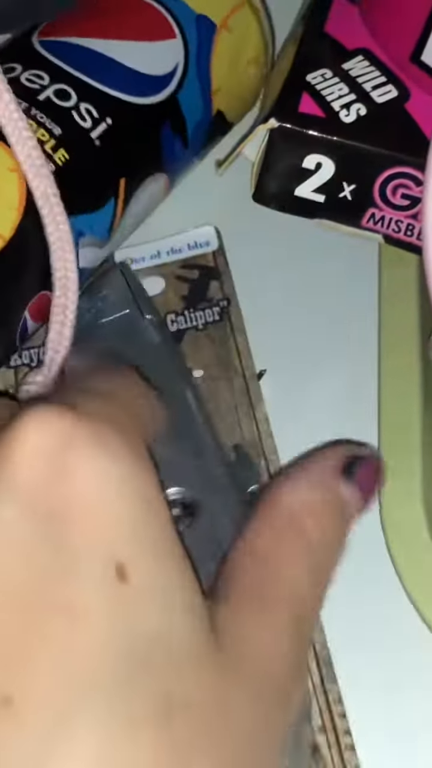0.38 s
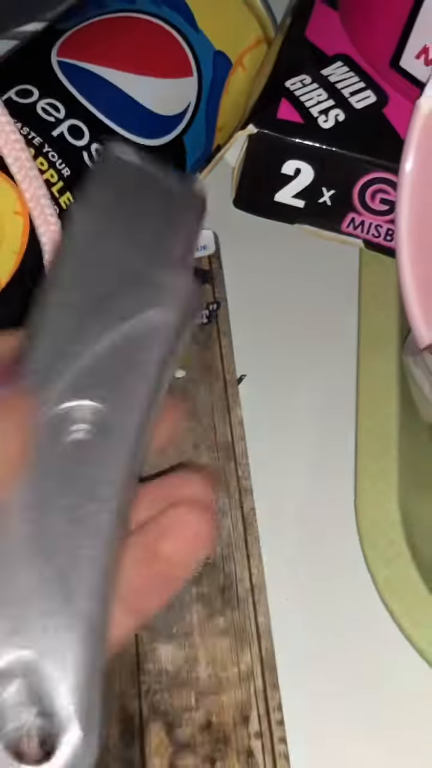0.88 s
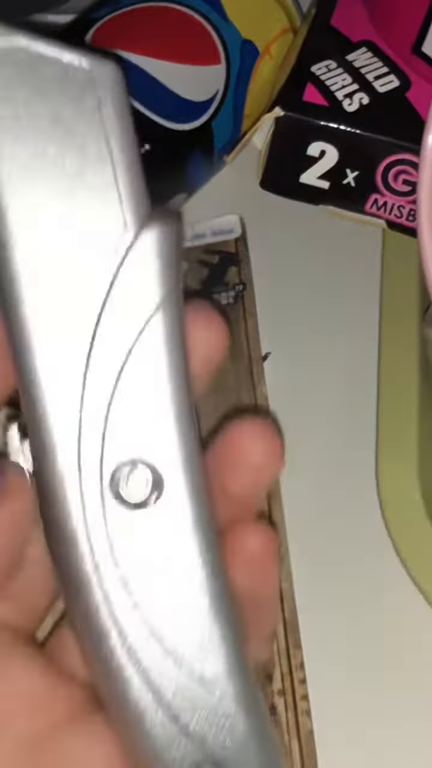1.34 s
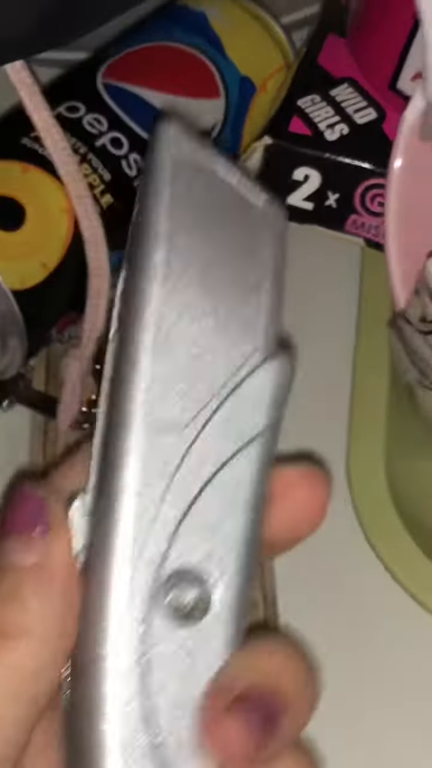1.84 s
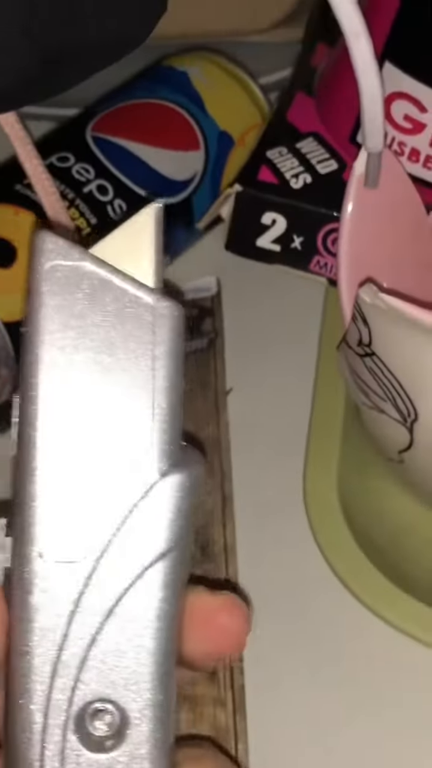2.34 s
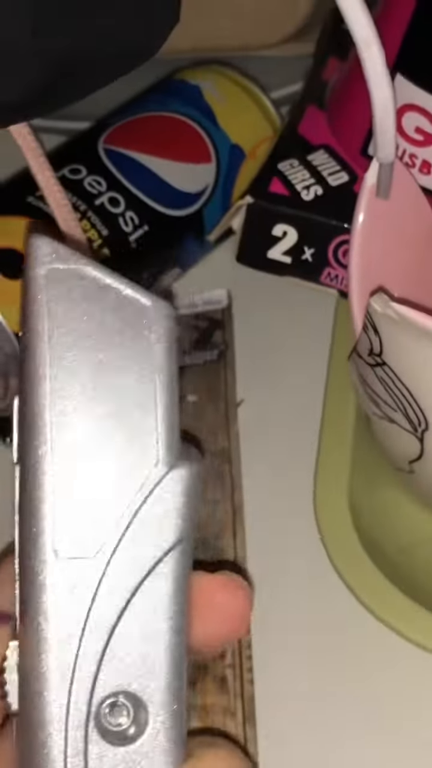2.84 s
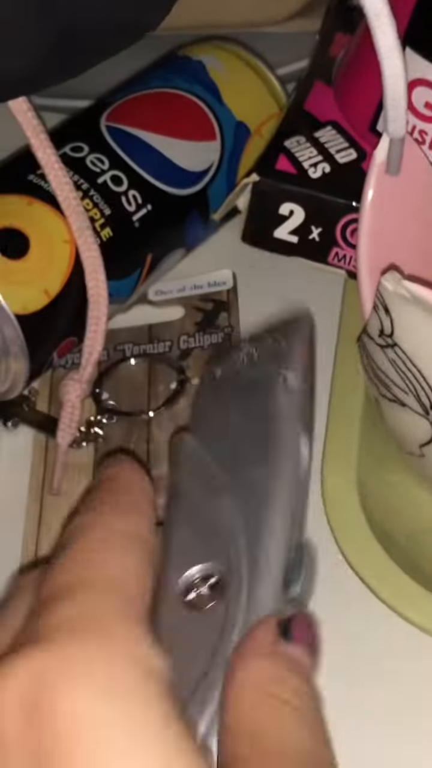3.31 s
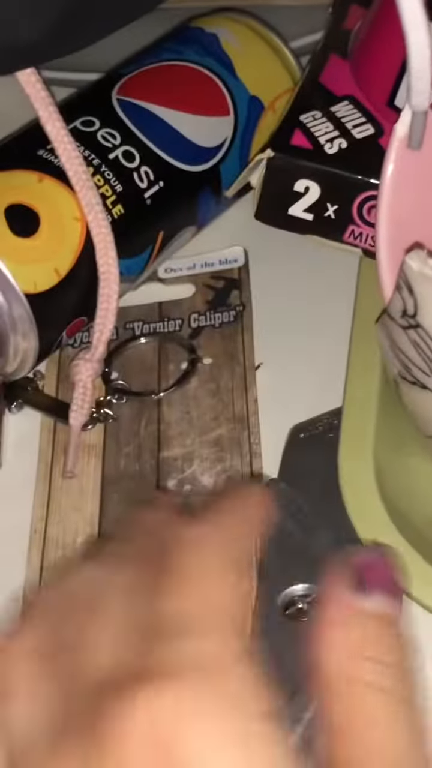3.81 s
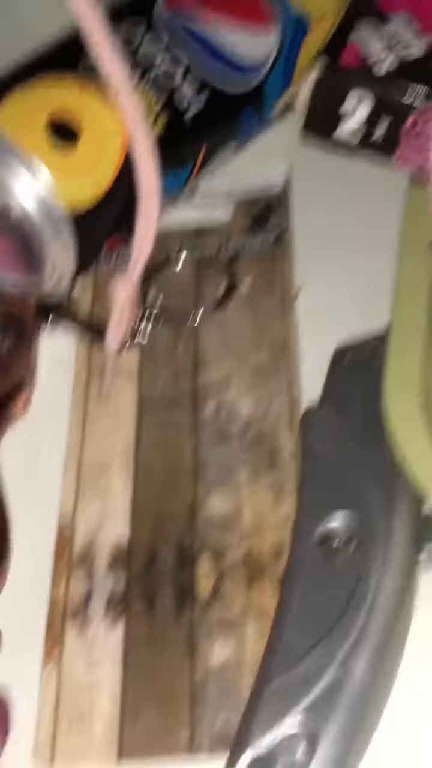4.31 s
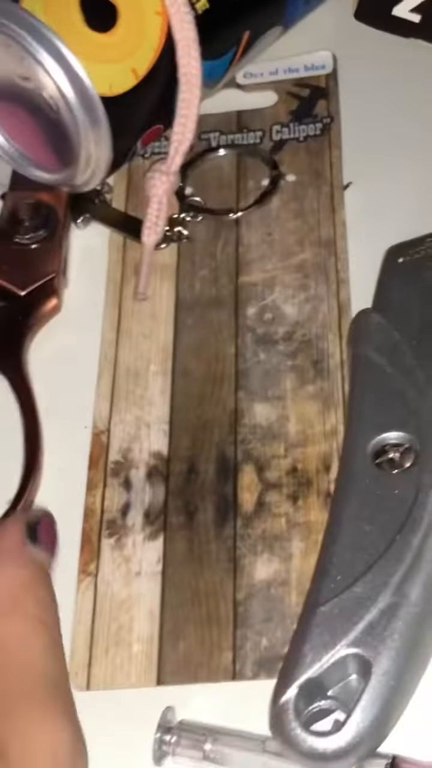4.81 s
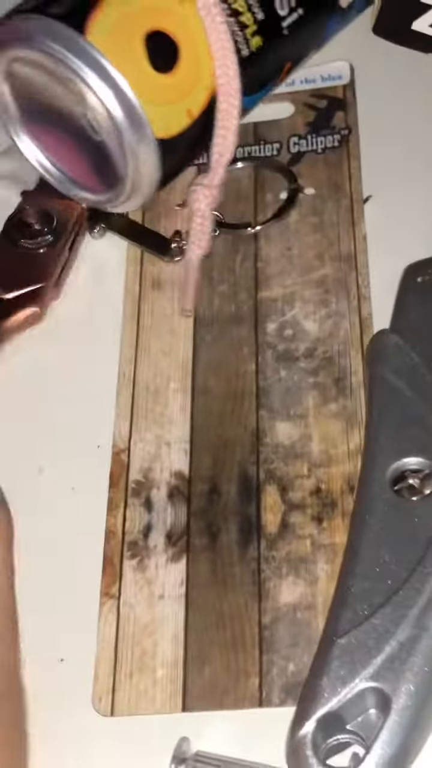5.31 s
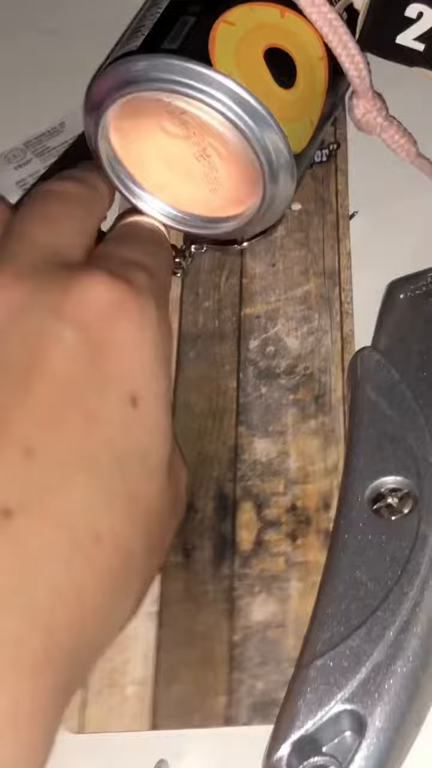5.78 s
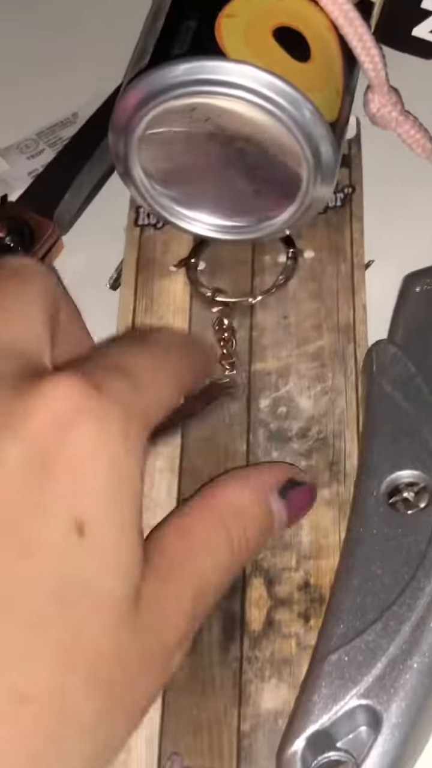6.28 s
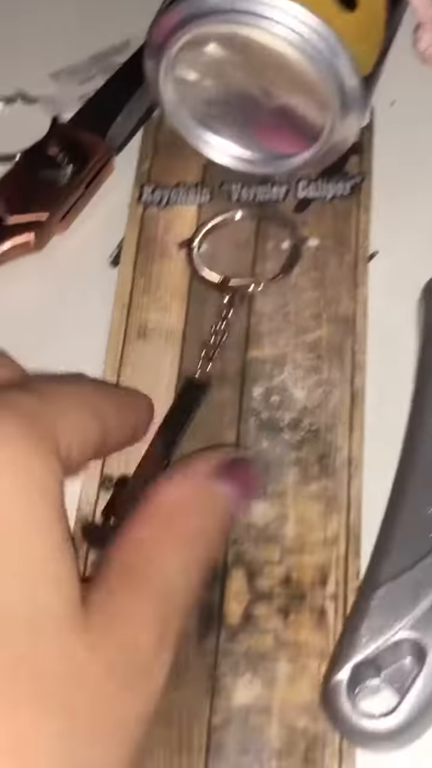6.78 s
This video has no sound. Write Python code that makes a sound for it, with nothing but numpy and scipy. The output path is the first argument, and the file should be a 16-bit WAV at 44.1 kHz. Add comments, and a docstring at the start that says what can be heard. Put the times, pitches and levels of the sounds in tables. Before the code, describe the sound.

Close handling of small metal things on a desk: rattles, crisp slider clicks, a loud clattering put-down, a tinny can knock and gritty dragging.

```python
"""A hand picks a metal utility knife out of clutter on a desk, works its slider and lays it down,
then drags a small tool on a keyring chain from under an empty can, in a quiet room close to a phone.
Knocks and ticks are short noisy contacts that ring desk, knife shell and steel modes; scrapes are
gritty friction noise with loose parts tapping along, and skids are narrow bands of noise.
The can rings when bumped and hums when rubbed; a short reverb and room tone lie behind."""
import sys
import numpy as np
from scipy import signal
from scipy.fft import rfft, irfft, next_fast_len
from scipy.io import wavfile
from scipy.ndimage import uniform_filter1d

SR = 44100
rng = np.random.default_rng(int(sys.argv[2]) if len(sys.argv) > 2 else 0)


def linear_from_db(decibels):
    """Turn decibels (scalar or array-like) into linear amplitude factors; 0 gives 1."""
    return 10 ** (np.asarray(decibels, float) / 20)


def materialize(psi):
    """Save the field psi as 16-bit PCM at rate SR to the path in sys.argv[1].

    A 1-D psi becomes a single channel; in a 2-D psi each row is a channel.
    """
    bounded = np.clip(np.atleast_2d(psi).T, -1, 1)
    quanta = np.round(bounded * 32767).astype(np.int16)
    wavfile.write(sys.argv[1], SR, quanta)


N = 314874  # samples, about 7.1 s
SPOT_DB = 3.5  # how unevenly a blow reaches the modes


def evened(x):
    """Scales to rms 1."""
    return x / np.sqrt(np.mean(x ** 2) + 1e-20)


def peaked(x, db):
    """Scales to a peak level."""
    return linear_from_db(db) * x / (abs(x).max() + 1e-12)


def read(points, hz):
    """Reads a curve of (Hz, value) points on a log-frequency axis."""
    f, value = np.transpose(points)
    return np.interp(np.log(hz + 1), np.log(f + 1), value)


def add(mix, s, sound):
    """Adds a sound at s seconds."""
    part = mix[max(round(s * SR), 0):][:len(sound)]
    part += sound[:len(part)]


def coloured(x, gain):
    """Filters by a gain given as a function of Hz."""
    size = next_fast_len(len(x))
    spectrum = rfft(x, size) * gain(np.fft.rfftfreq(size, 1 / SR))
    return irfft(spectrum, size)[:len(x)]


def band(x, lo_hz, hi_hz):
    """Causal band-pass."""
    sos = signal.butter(2, [lo_hz, min(hi_hz, .45 * SR)], "band", fs=SR, output="sos")
    return signal.sosfilt(sos, x)


def ring(modes, t, luck, centre_hz, octaves, spot_db):
    """Impulse response of a struck thing; the spot that is hit sets how much each mode gets."""
    hz, db, t60 = np.transpose(modes)[:, :, None]
    near_db = -3 * (np.log2(hz / centre_hz) / octaves) ** 2
    spot = luck[:len(modes), None]
    decay_db = -60 * t / np.maximum(t60, .003)
    level = linear_from_db(db + near_db + spot_db * spot + decay_db)
    detuned_hz = hz * (1 + 0.0093 * spot)
    return (level * np.sin(2 * np.pi * detuned_hz * t)).sum(0)


def blow(modes, luck, db, centre_hz, t60, crack_db, octaves, rise, longest, lowest_hz):
    """A rough contact that dies fast: it sounds itself and drives the modes, damped by the hand."""
    t = np.arange(4096) / SR
    contact = luck * np.minimum(t / rise, 1) * linear_from_db(-60 * t / max(t60, .002))
    crack = band(contact, centre_hz / 2 ** octaves, centre_hz * 2 ** octaves)
    held = ring(modes, t, luck[::-1], centre_hz, octaves, spot_db=SPOT_DB) * linear_from_db(-60 * t / longest)
    chatter = signal.fftconvolve(contact, held)[:len(t)]
    rung = peaked(held, 0) + peaked(chatter, -3)  # first touch, then the chatter after it
    both = peaked(rung, 0) + peaked(crack, crack_db)
    return contact, peaked(band(both, lowest_hz, 14000), db)


# Something lands on the desk or the clutter.
# Each row: start in seconds, peak in dB, centre in Hz, desk thud in dB re that peak.
KNOCKS = [(.004, -23.5, 395, -11.5), (.039, -14.5, 1340, -16), (.223, -35, 380, -15),
          (0.25, -29.5, 387, -4.5), (0.271, -29.5, 358, -20), (0.434, -40.5, 870, 1.5),
          (0.637, -40, 1630, -0.5), (0.681, -21.5, 2160, -45), (0.724, -29, 1445, -18),
          (.743, -30, 1670, -31), (1.169, -27.5, 456, -16), (1.196, -28.5, 1075, -11),
          (1.697, -49, 1250, -27), (1.812, -49, 848, -24.5), (2.485, -52, 1950, -28),
          (2.692, -26, 2200, -38), (2.983, -49, 1080, -31), (3.425, -3, 460, -34), (3.424, -6, 1400, -40),
          (3.44, -14, 1620, -31), (3.479, -17, 444, -18.5), (3.536, -15, 540, -25.5),
          (3.6, 2.5, 1400, -21.5), (3.616, -10.5, 410, -14), (3.639, -6, 865, -19), (3.679, -19, 740, -7.5),
          (3.794, -24, 791, -13), (3.828, -25, 656, -23), (3.838, -22.5, 940, -20), (3.873, -19, 950, -27),
          (4.438, -50, 377, -13), (4.981, -37.5, 369, -29), (5.056, -30.5, 367, -29.5),
          (5.177, -40, 347, -20), (5.328, -18, 577, -65), (5.375, -23.5, 1120, -12), (5.53, -15, 1510, -16),
          (5.546, -17, 884, -23), (5.565, -24, 910, -18.5), (5.706, 0, 1180, -41.5), (5.722, -14, 338, -43),
          (5.854, -8.5, 1006, -46), (5.924, -13, 945, -20), (5.953, -19.5, 980, -21),
          (6.032, -18.5, 936, -51), (6.451, -37, 436, -2), (6.559, -11.5, 713, -18),
          (6.596, -10.5, 670, -22), (6.615, -13, 696, -9.5), (6.649, -3, 1260, -28),
          (6.873, -21, 1430, -35.5), (7.074, -17, 1660, -37)]
# Knife shell and desk top. Each row: mode in Hz, level in dB, undamped t60 in seconds.
BODY = [(358, 5, 0.037), (460, 11.5, 0.021), (750, -1, 0.025), (800, -1, 0.044), (1045, 1, 0.04),
        (1200, 12.5, 0.013), (1416, -5.5, 0.15), (1537, 5.5, 0.049), (1723, -5, 0.071), (2260, -13, 0.013),
        (2200, 0, 0.11), (2760, 2.5, 0.049)]
KNOCK_T60_S, KNOCK_DULL = 0.03, 0.26  # contact t60 at 1 kHz; duller knocks last longer by this power


def knocks():
    """Dull blows: shell and desk modes over a low thud."""
    out = np.zeros(N)
    for (s, db, hz, thud_db), luck in zip(KNOCKS, rng.standard_normal((len(KNOCKS), 4096))):
        t60 = KNOCK_T60_S * (hz / 1000) ** -KNOCK_DULL
        contact, knock = blow(BODY, luck, db, hz, t60, crack_db=-5, octaves=0.66,
                              rise=0.00022, longest=.07, lowest_hz=312)
        thud = band(band(contact, 60, 320), 47, 640)
        add(out, s, knock + peaked(thud, db + thud_db))
    return out


# Metal meets metal: slider, blade, ring, chain.
# Each row: start in seconds, peak in dB, centre in Hz, sparkle in dB re that peak.
TICKS = [(.0258, -15, 9290, 7), (.071, -28.5, 6040, -22.5), (0.102, -38.5, 6300, -20.5),
         (0.1243, -22.5, 5800, -18), (0.1287, -27, 5440, -17.5), (0.2022, -41, 2880, 1),
         (0.2377, -28, 6200, -12), (0.2488, -19, 4680, -16), (0.2703, -15, 6300, -20),
         (0.2943, -16.5, 8700, -1.5), (0.4502, -27, 6440, -19.5), (0.5549, -34.5, 4570, -20),
         (0.594, -29, 5300, -14), (0.6362, -25, 6750, -6.5), (0.6969, -24, 6060, -18.5),
         (1.1652, -25.5, 4000, -17), (1.1976, -40, 3050, -7), (1.5657, -39.5, 6030, -19),
         (1.5795, -26.5, 3430, -9), (1.697, -43.5, 2960, -18), (1.7124, -48.5, 2860, -31),
         (1.811, -44, 6200, -32), (1.932, -13, 3444, -10.5), (1.944, -15, 3870, -4.5),
         (2.0257, -35.5, 3180, -3.5), (2.0693, -10, 6050, -4), (2.4856, -40.5, 3250, -24.5),
         (2.5734, -12.5, 6550, -25), (2.5857, -37, 3280, 3), (2.612, -37.5, 3290, -29),
         (2.6914, -9, 6220, -16), (2.7102, -14, 3100, -13.5), (2.7423, -17.5, 5600, -20),
         (2.835, -43, 3230, -33), (2.9352, -43.5, 2800, 4), (2.983, -30.5, 4300, -17),
         (3.251, -50.5, 6400, -17), (3.3991, -49.5, 6534, -17), (3.4217, 2, 4000, -12.5),
         (3.4439, -14, 5170, -15.5), (3.4776, -23.5, 3500, -25), (3.5354, -24.5, 5700, -12),
         (3.561, -28.5, 3170, -9), (3.6002, 1.5, 2460, -28.5), (3.6386, -14, 2400, -21.5),
         (3.6745, -23.5, 2550, -11.5), (3.8247, -32, 3500, -5), (3.8351, -15.5, 6050, -9),
         (3.8496, -23.5, 5840, -24), (3.858, -19.5, 2840, -9.5), (3.8726, -14.5, 6400, -13),
         (5.013, -57, 5560, 0.5), (5.0512, -42, 4200, 1.5), (5.0676, -33.5, 5200, -2),
         (5.0825, -45, 2920, -2), (5.317, -30.5, 3950, -12.5), (5.4134, -6, 6070, -5.5),
         (5.6458, -28, 6260, -8.5), (5.7074, -3.5, 5800, -14.5), (5.7179, -9.5, 3260, -11),
         (5.7551, -27.5, 6000, -25), (5.8537, -17.5, 2930, -7), (5.8736, -24, 4040, -4.5),
         (5.8944, -18.5, 5280, -11), (5.9253, -20.5, 2900, -11.5), (5.9501, -29, 2925, -14.5),
         (6.0316, -38, 3040, -20), (6.2602, -39, 4790, -8.5), (6.2724, -24, 4800, -10),
         (6.2923, -28, 6550, -23), (6.3514, -31.5, 6300, -21), (6.6512, -29, 2640, -30),
         (6.859, -41, 5960, -14.5), (6.8713, -21.5, 6800, -10), (7.026, -12, 4615, -7),
         (7.076, -15.5, 7100, -5.5)]
# Blade and small steel parts. Each row: mode in Hz, level in dB, undamped t60 in seconds.
STEEL = [(3000, -6, 0.026), (3250, 6, 0.012), (4200, -7.5, 0.0054), (5230, -16.5, 0.0065),
         (6040, -12.5, 0.023), (6220, 5, 0.01), (7160, 0, 0.0083), (7700, -19, 0.005), (9030, -2.5, 0.025),
         (9900, -14.5, 0.016), (11600, -4.5, 0.048), (12000, 0.5, 0.043), (12700, -9, .01)]
TICK_T60_S = 0.016  # contact t60


def ticks():
    """Bright blows: short steel modes, with a sparkle on top."""
    out = np.zeros(N)
    for (s, db, hz, sparkle_db), luck in zip(TICKS, rng.standard_normal((len(TICKS), 4096))):
        contact, tick = blow(STEEL, luck, db, hz, TICK_T60_S, crack_db=0.0, octaves=0.6,
                             rise=0.00044, longest=0.026, lowest_hz=1400)
        sparkle = band(band(contact, 9500, 15500), 9500, 15500)
        add(out, s, tick + peaked(sparkle, db + sparkle_db))
    return out


def stroke(t, start, end, rise, fall, fade_db):
    """0 to 1 and back: rubbing rises over the given time, tires and lets go over the given fall time."""
    tiring = linear_from_db(-fade_db * np.clip((t - start) / max(end - start, .005), 0, 1))
    letting_go = np.clip((end - t) / fall + .5, 0, 1) ** 2
    return np.clip((t - start) / rise, 0, 1) * letting_go * tiring


def patchy(x, db):
    """The colour shifts in patches as other spots of the surfaces meet."""
    z = signal.stft(x, nperseg=256)[2]
    over_time = uniform_filter1d(rng.standard_normal(z.shape[::-1]), size=8, axis=0)
    patches = uniform_filter1d(over_time, size=4, axis=1)
    return signal.istft(z * linear_from_db(db * evened(patches).T), nperseg=256)[1][:len(x)]


JINGLES_PER_S, JINGLE_SPREAD_DB = 90, 5.5
JINGLE_RING_S = .045  # longest t60 of a tap


def jingle():
    """Loose parts tap at random, each spot with its own share of the modes."""
    t, modes, out = np.arange(2048) / SR, BODY + STEEL + CAN, np.zeros(N)
    sizes = linear_from_db(JINGLE_SPREAD_DB * np.minimum(rng.exponential(1, N), 3))
    taps = sizes * (rng.random(N) < JINGLES_PER_S / SR)
    spot = rng.integers(0, 8, N)
    for k, luck in enumerate(rng.standard_normal((8, len(modes)))):
        tap = ring(modes, t, luck, 3100, 1.3, spot_db=SPOT_DB) * linear_from_db(-60 * t / JINGLE_RING_S)
        out += signal.oaconvolve(taps * (spot == k), tap / np.linalg.norm(tap))[:N]
    return evened(out)


# Things slide and shuffle, or rattle on after a blow, one row each.
# Each row: start in seconds, end in seconds, level in dB ahead of the layer levels, brightness in dB.
SCRAPES = [(0, .042, -39.5, 6.5), (.041, .119, -44.5, 0), (.152, .22, -62.5, -9), (.208, .319, -45.5, -1.5),
           (.304, .403, -56.5, 2), (.395, .479, -53.5, 7), (.47, .584, -63, -1.5), (.577, .718, -56, 6),
           (.715, .769, -56.5, -5), (1.1, 1.169, -55.5, -11.5), (1.157, 1.248, -72, -25),
           (1.302, 1.436, -75, 1), (1.572, 1.724, -79, 5), (1.952, 1.994, -73.5, -0.5),
           (2.013, 2.082, -58, 5.5), (2.568, 2.636, -72.5, 10), (2.691, 2.708, -39, 12),
           (2.726, 2.749, -49.5, 6), (3.417, 3.484, -29.5, -3), (3.532, 3.585, -43, -13),
           (3.592, 3.687, -36, -8), (3.68, 3.797, -56.5, -8.5), (3.795, 3.822, -56.5, -12),
           (3.829, 3.89, -36, -8.5), (4.435, 4.5, -82, -7), (4.55, 4.65, -66.5, -2.5),
           (4.68, 4.757, -69.5, -5.5), (4.981, 5.043, -68, -13), (5.031, 5.126, -52, -6.5),
           (5.146, 5.17, -53, 6.5), (5.172, 5.266, -66.5, 1.5), (5.245, 5.337, -49.5, -2.5),
           (5.311, 5.413, -45, -3), (5.407, 5.456, -44, 10), (5.449, 5.528, -59, 5.5),
           (5.526, 5.546, -42.5, -4), (5.546, 5.611, -50, -9.5), (5.646, 5.716, -50, -0.5),
           (5.714, 5.751, -28.5, -1.5), (5.757, 5.772, -45, 6.5), (5.827, 5.89, -35.5, -5.5),
           (5.877, 5.923, -37.5, 1.5), (5.932, 6.009, -40.5, -1), (5.993, 6.077, -45.5, -3.5),
           (6.052, 6.193, -54, 0), (6.223, 6.304, -54.5, 8.5), (6.318, 6.392, -62, 8.5),
           (6.395, 6.474, -67.5, 11), (6.468, 6.574, -55.5, 6), (6.54, 6.684, -45, -8),
           (6.56, 6.73, -69.5, 7), (6.651, 6.752, -53.5, -12.5), (6.832, 6.892, -62.5, -5),
           (6.904, 6.975, -53, 9), (7.028, 7.07, -62, 5.5), (7.069, 7.147, -48, 2.5)]
# The hand moving among the clutter late on: one long stroke, columns as in SCRAPES.
SHUFFLE = (5, 7, -65.5, -4.5)
# Colour of sliding. Each row: frequency in Hz, level in dB per Hz.
DRAG = [(24, -46), (40, -30.5), (168, -4.5), (406, -3), (438, 2), (564, 2), (656, -3), (1710, -1),
        (1990, -11), (4230, -10.5), (11900, -29), (15300, -24.5), (16500, -53)]
# Rumble, drag, rasp and hiss of a stroke of even brightness: one level in dB for each.
LAYER_DB = (-6.5, 1, -0.5, -1)
# How far each of those layers follows the brightness: dB per dB.
LAYER_STEP = (-1, -0.7, .55, 1.5)
JINGLE_DB = -4.5  # taps re the friction


def friction():
    """Tiny uneven catches roughen smooth noise; the parts ring along and loose ones tap."""
    t = np.arange(2048) / SR
    catches = linear_from_db(1.0 * np.minimum(rng.exponential(1, N), 3)) * (rng.random(N) < 300 / SR)
    lumps = signal.lfilter([1], [1, -np.exp(-1 / (0.0023 * SR))], catches)
    rough = (1 + 0.79 * evened(lumps)) * rng.standard_normal(N)
    grit = coloured(rough, lambda hz: linear_from_db(read(DRAG, hz)))
    parts = BODY + STEEL
    rattle = ring(parts, t, np.zeros(len(parts)), 1700, 2.3, spot_db=0)
    ringing = evened(signal.oaconvolve(grit, rattle)[:N])
    return patchy(evened(grit) + linear_from_db(-10.5) * ringing + linear_from_db(JINGLE_DB) * jingle(), db=1.0)


def scrapes():
    """Sliding and rattling: one friction noise in four bands that follow each stroke's brightness."""
    t = np.arange(N) / SR
    grit = friction()
    slow = t[::32]  # envelopes need fewer points
    rows = SCRAPES + [SHUFFLE]
    blows = np.array([row[0] for row in KNOCKS + TICKS])
    strokes = []
    for start, end, _, _ in rows:
        nearest = blows[abs(blows - start).argmin()]
        # a blow close by sets the stroke off at once; otherwise it swells
        begin, rise = (nearest, .003) if abs(nearest - start) < .012 else (start, .03)
        strokes.append(stroke(slow, begin, end, rise, fall=0.032, fade_db=1.5))
    strokes = np.array(strokes)
    out = np.zeros(N)
    level_db, brightness = np.transpose(rows)[2:]
    edges_hz = [(60, 400), (400, 2500), (2500, 7000), (7000, 16500)]
    for (lo, hi), layer_db, step in zip(edges_hz, LAYER_DB, LAYER_STEP):
        layer = evened(coloured(grit, lambda hz: 1 / (1 + (lo / (hz + 1)) ** 6) / (1 + (hz / hi) ** 6)))
        envelope = linear_from_db(level_db + layer_db + step * brightness) @ strokes
        out += layer * np.interp(t, slow, envelope)
    return out


# One part drags on another and sings in a narrow band. Each row: start in seconds, end in seconds,
# centre in Hz, distance in Hz from the centre to half gain, level in dB.
SKIDS = [(2.018, 2.049, 3260, 500, -46), (3.627, 3.82, 3400, 600, -54), (5.152, 5.18, 4360, 880, -48.5),
         (5.873, 5.885, 13600, 900, -28.5), (6.001, 6.187, 4640, 800, -43.5),
         (6.271, 6.279, 13200, 813, -33), (6.424, 6.58, 5600, 1200, -54), (7.034, 7.06, 7160, 420, -51.5),
         (7.02, 7.078, 3940, 413, -55), (7.072, 7.14, 3370, 800, -44)]


def skids():
    """Friction noise inside one resonance, swelling and fading."""
    out = np.zeros(N)
    for (start, end, centre_hz, width, db), noise in zip(SKIDS, rng.standard_normal((len(SKIDS), SR // 4))):
        sung = evened(coloured(noise, lambda hz: 1 / (1 + ((hz - centre_hz) / width) ** 4)))
        sung = sung[:round((end - start) * SR)]
        add(out, start, linear_from_db(db) * sung * signal.windows.tukey(len(sung), .6))
    return out


# Thin wall of the can. Each row: mode in Hz, level in dB, undamped t60 in seconds.
CAN = [(845, -8, .3), (861, 0, .4), (1986, -14, .6), (355, -3, .18), (2230, -7, .12), (490, -10, .15),
       (1184, -8, .1), (1427, -8, .12), (1728, -12, .12), (2700, -12, .12), (3020, -16, .1),
       (3550, -14, .12), (3920, -17, .15), (4150, -14, .15), (5300, -14, .14), (6200, -17, .1)]
# The can is bumped. Each row: start in seconds, peak of its ring in dB, Hz around which it is set
# going, spread in octaves.
CAN_BUMPS = [(.005, -30, 400, 0.31), (.039, -27.5, 1070, 0.65), (.065, -23.5, 836, 0.42),
             (0.226, -34, 360, 0.46), (.25, -29.5, 1500, 1.7), (.742, -46, 1200, 0.9),
             (5.528, -38, 3800, 0.8), (5.707, -15.5, 880, 1.7), (5.72, -15.5, 362, 0.524),
             (5.854, -38, 900, 0.99)]
# Sliding things touch the can. Each row: start in seconds, end in seconds, hum in dB re the sliding.
CAN_RUBBED = [(0, 0.774, -7), (5.051, 5.63, -8.5), (5.685, 5.8, -4), (5.864, 6.3, -16)]
CAN_HUM_HZ, CAN_HUM_OCTAVES = 4000, 1.3  # rubbing favours the wall's upper modes
CAN_HUM_S = .2  # longest t60 of the wall while things lean on it


def can(sliding):
    """The empty can rings on after each bump and hums while things slide along it."""
    t, out = np.arange(SR // 2) / SR, np.zeros(N)
    even = np.zeros(len(CAN))  # no spot is favoured
    for s, db, hz, octaves in CAN_BUMPS:
        bump = ring(CAN, t, even, hz, octaves, spot_db=0) * np.minimum(t / 0.001, 1)
        add(out, s, peaked(bump, db))
    touching = np.zeros(N)
    for start, end, db in CAN_RUBBED:
        touching += linear_from_db(db) * stroke(np.arange(N) / SR, start, end, rise=.01, fall=.05, fade_db=0)
    wall = ring(CAN, t, even, CAN_HUM_HZ, CAN_HUM_OCTAVES, spot_db=0)
    wall = wall * linear_from_db(-60 * t / CAN_HUM_S)  # partly damped by what leans on it
    return out + signal.oaconvolve(sliding * touching, wall / np.linalg.norm(wall))[:N]


# Reverb of the room. Each row: frequency in Hz, t60 in seconds.
ROOM = [(200, 0.21), (1000, 0.31), (4000, 0.3), (12000, 0.2)]


def room(x):
    """Sparse taps of random sign, each band dying at its own speed."""
    taps = np.zeros(SR // 2)
    at = np.arange(200, len(taps) - 20, 20)
    taps[at + rng.integers(0, 20, len(at))] = rng.choice([-1., 1.], len(at))
    hz, t, z = signal.stft(taps, SR, nperseg=256)
    dying = linear_from_db(-60 * t / read(ROOM, hz)[:, None])
    tail = signal.istft(z * dying, SR, nperseg=256)[1]
    return signal.oaconvolve(x, tail / np.linalg.norm(tail))[:N]


# Colour of the room tone. Each row: frequency in Hz, relative level in dB per Hz.
AIR = [(12, -52), (20, -18), (32, -13), (92, -1), (132, -5), (354, -8), (408, -11), (1980, -24),
       (2850, -24.5), (3780, -25), (6460, -26.5), (15000, -29.5), (16800, -30)]
AIR_DB = -67  # rms around which it wavers


def air():
    """Room tone and microphone hiss: coloured noise, wavering a little."""
    sway_db = 1.0 * evened(uniform_filter1d(rng.standard_normal(N), 6000))
    tone = evened(coloured(rng.standard_normal(N), lambda hz: linear_from_db(read(AIR, hz))))
    return linear_from_db(AIR_DB + sway_db) * tone


def scene():
    """All handling, the can, the room and its tone."""
    sliding = scrapes()
    near = knocks() + ticks() + sliding + skids() + can(sliding)
    return (near + linear_from_db(-17.5) * room(near) + air())[None]


def low_pass(x):
    """Removes everything above the highest recorded frequency."""
    return signal.sosfilt(signal.butter(12, 16990, fs=SR, output="sos"), x)


# Microphone response. Each row: frequency in Hz, gain in dB.
MICROPHONE = [(20, -20.5), (45, -2), (90, -2), (14000, -2.5), (15600, -3.5), (16400, -13)]


def record(dry):
    """Microphone colour, then a soft overload that flattens the loudest blows."""
    ceiling = .95
    heard = coloured(dry[0], lambda hz: linear_from_db(read(MICROPHONE, hz)))[None]
    mix = ceiling * np.tanh(heard / ceiling)
    return low_pass(mix)


dry = scene()
out = record(dry)
materialize(out)
```